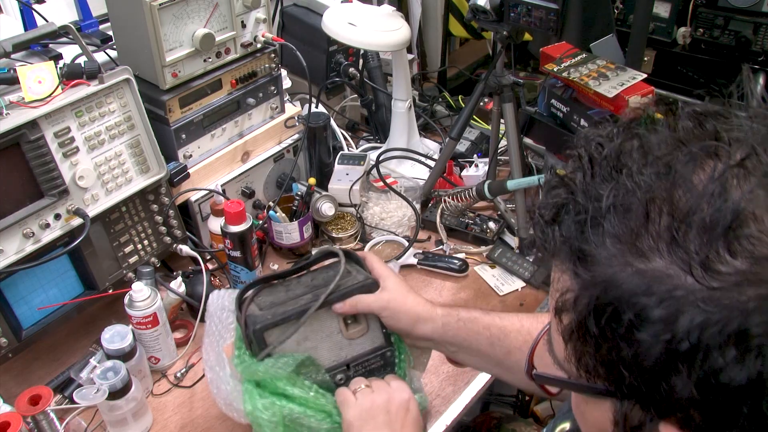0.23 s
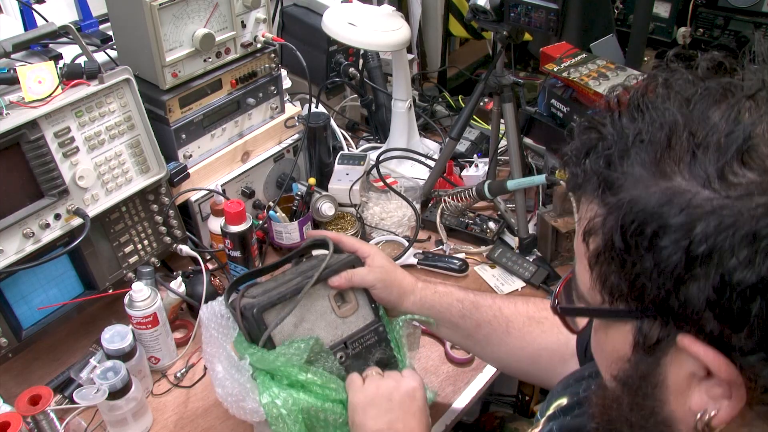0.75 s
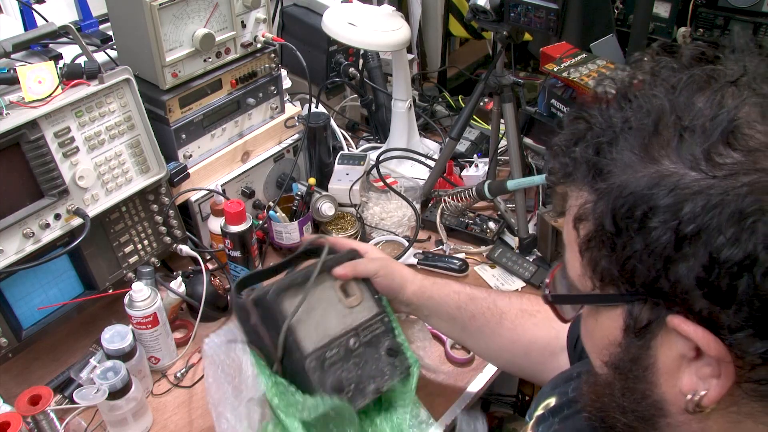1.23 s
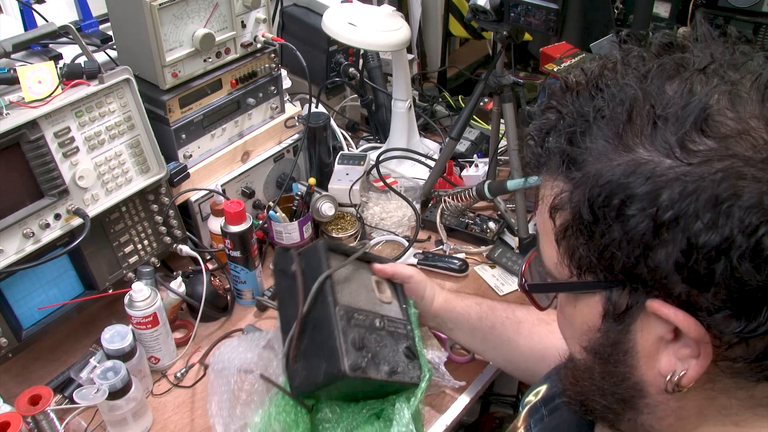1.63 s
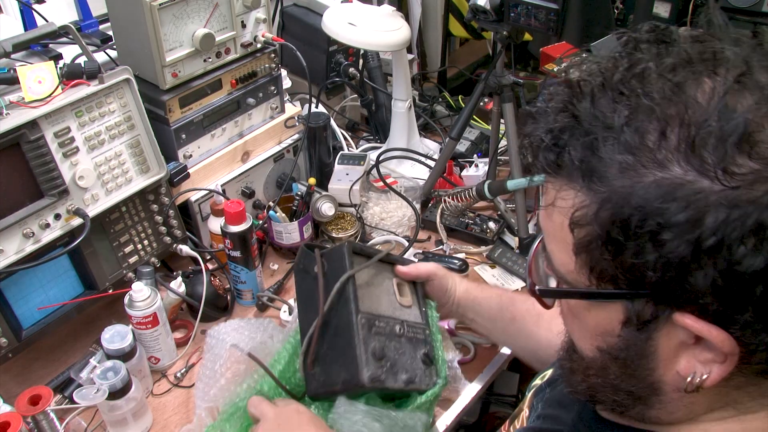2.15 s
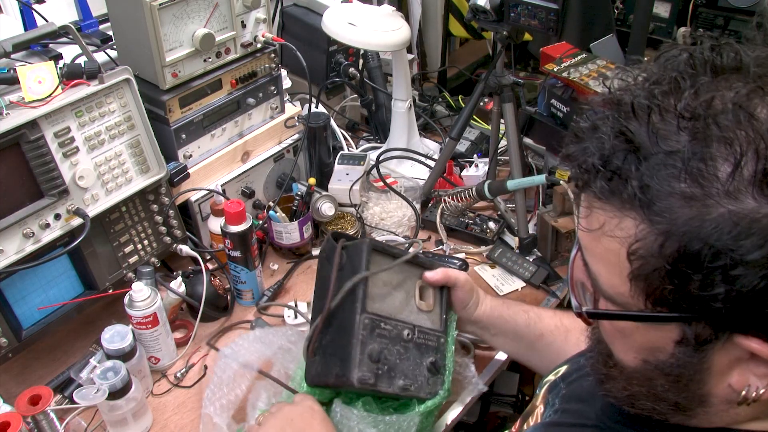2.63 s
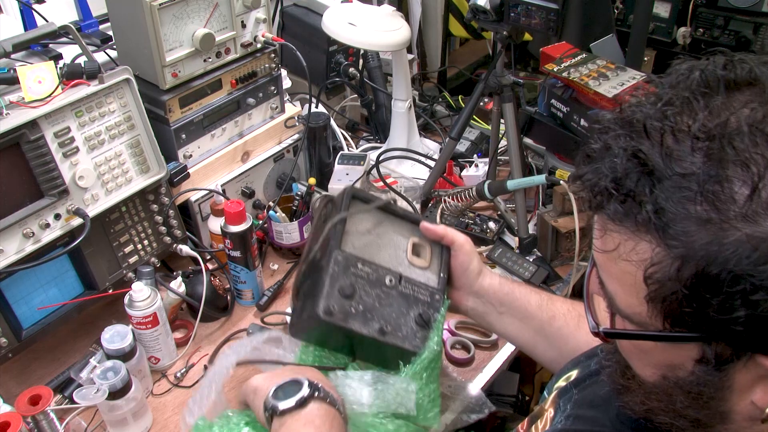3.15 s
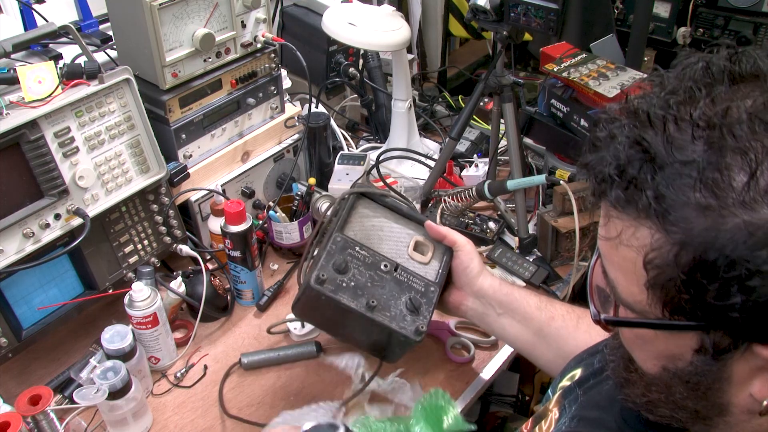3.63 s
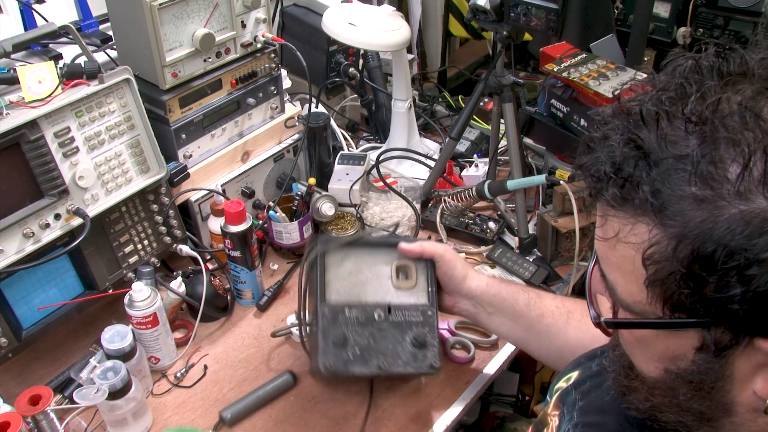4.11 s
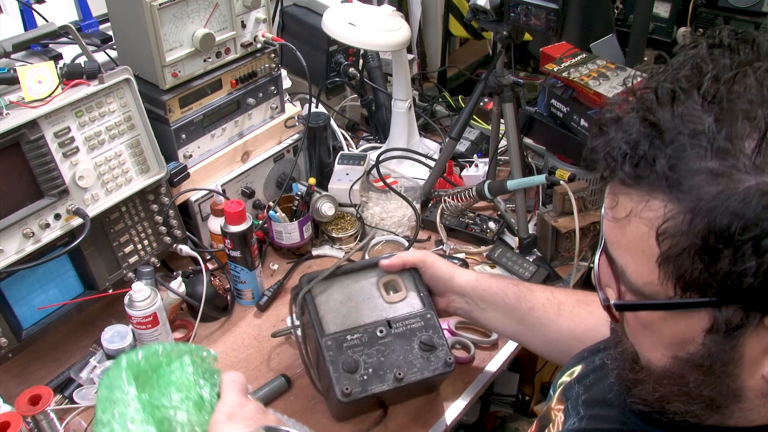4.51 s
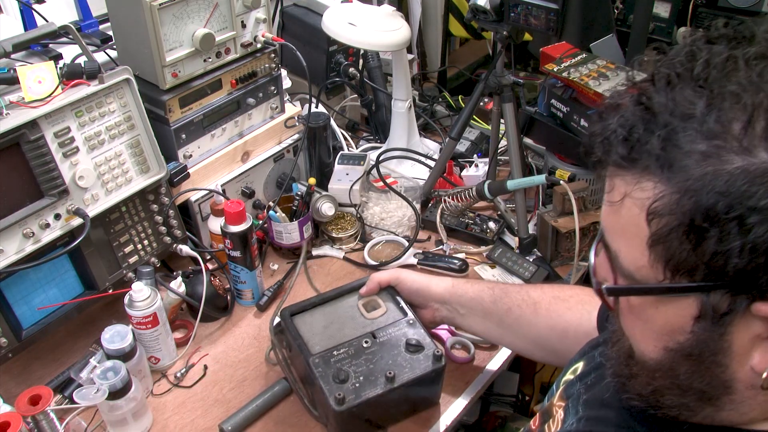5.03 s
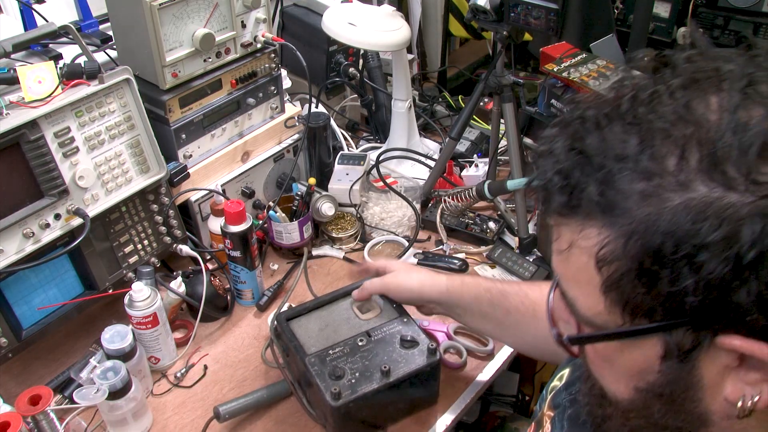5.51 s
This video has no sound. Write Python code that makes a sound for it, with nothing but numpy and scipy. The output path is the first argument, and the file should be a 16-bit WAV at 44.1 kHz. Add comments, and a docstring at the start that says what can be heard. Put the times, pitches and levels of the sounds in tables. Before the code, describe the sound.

Plastic wrap crackles in uneven pulls while a boxy instrument is rubbed, bumped and put down on a bench, over steady fan noise.

```python
"""A workbench in a cluttered room: bubble wrap is pulled off a small boxy instrument by hand.
The film buckles in thousands of tiny clicks and a few loud snaps. The hollow case rings when rubbed
or bumped, its fittings clink, its feet judder, and a probe lands on the bench with a crack. The last
of the film drags off with a thin stick-slip squeak, and the case is set down with two dull knocks.
Fans run steadily throughout."""
import sys
import numpy as np
from scipy import signal
from scipy.fft import rfft, irfft, next_fast_len
from scipy.io import wavfile
from scipy.ndimage import uniform_filter1d

SR = 44100
rng = np.random.default_rng(int(sys.argv[2]) if len(sys.argv) > 2 else 0)


def bounce(signal):
    """Save signal as a 16-bit WAV file at the path given by the first command-line argument."""
    frames = np.transpose(np.atleast_2d(signal))
    limited = np.clip(frames, -1, 1)
    pcm = np.round(limited * 32767).astype(np.int16)
    wavfile.write(sys.argv[1], SR, pcm)


N = 254456
TIME = np.arange(N) / SR
TOP_HZ = .45 * SR
SLIDE_ATTACK_S, SLIDE_T60_S = .041, .19


def undb(db):
    """Decibels to gain."""
    return 10 ** (np.asarray(db) / 20)


def unit(x):
    """Scale to rms 1."""
    return x / np.sqrt(np.mean(x ** 2))


def pan(left_db):
    """Left and right gains for a level difference."""
    return undb(np.array([[left_db], [-left_db]]) / 2)


def decay(t, t60_s):
    """Exponential fall, 60 dB in t60_s; 1 before t = 0."""
    return np.exp(-np.log(1000) * np.maximum(t, 0) / t60_s)


def add(out, start_s, sound):
    """Mix a sound in at start_s."""
    i = max(int(start_s * SR), 0)
    out[..., i:i + sound.shape[-1]] += sound[..., :N - i]


def band(x, lo_hz, hi_hz, order=2):
    """Butterworth band-pass."""
    return signal.sosfilt(signal.butter(order, [lo_hz, hi_hz], "band", fs=SR, output="sos"), x)


def colour(x, spectrum):
    """Filter by a curve of (f/Hz, level/dB) points."""
    hz, db = np.transpose(spectrum)
    size = next_fast_len(N)
    bins_hz = np.maximum(np.fft.rfftfreq(size, 1 / SR), 1)
    gain = undb(np.interp(np.log(bins_hz), np.log(hz), db))
    return irfft(rfft(x, size) * gain, size)[..., :N]


def convolve(x, response):
    """Apply a left and right impulse response."""
    return signal.oaconvolve(np.atleast_2d(x), response, axes=1)[:, :N]


def burst(t60_s, hold_s=0):
    """Unit-energy stereo noise: holds, then decays."""
    t = np.arange(int(SR * (hold_s + t60_s)) + 2) / SR
    noise = rng.standard_normal((2, len(t))) * decay(t - hold_s, t60_s)
    return noise / np.sqrt(np.sum(noise ** 2, axis=1, keepdims=True))


def pop(x, db, over_s=.003):
    """Scale a short sound to an rms level, its energy taken over over_s."""
    return x * undb(db) * np.sqrt(over_s * SR / np.sum(x ** 2, axis=1, keepdims=True))


def ring(modes, wide_hz):
    """Damped modes; left and right drift out of phase with pitch, 90 degrees from wide_hz up."""
    t = np.arange(SR // 2) / SR
    out = 0
    for k, (hz, db, t60_s) in enumerate(modes):
        skew_rad = (-1) ** k * min(hz / wide_hz, 1) * np.array([[1], [-1]]) * np.pi / 4
        out = out + undb(db) * np.sin(2 * np.pi * hz * t + skew_rad) * decay(t, t60_s)
    return out


def clicks(per_s, spread_db):
    """Random impulses of either sign and log-normal size."""
    due = rng.random(N) < per_s / SR
    size = undb(spread_db * np.minimum(rng.standard_normal(N), 2.5))
    return due * size * rng.choice([-1, 1], N)


def strokes(rows, attack_s, t60_s):
    """Envelope of hand movements: each rises, holds and decays; powers add."""
    power = 0
    for start_s, length_s, db in rows:
        rise = np.clip((TIME - start_s) / attack_s, 0, 1)
        fall = decay(TIME - start_s - length_s, t60_s)
        power = power + (undb(db) * rise * fall) ** 2
    return np.sqrt(power)


# Room tone spectrum: f/Hz, level/dB
ROOM_SPECTRUM = [(18, -39), (30, 2), (145, 3), (194, -10.5), (364, -5.5), (1350, -15), (1540, -12),
                 (6550, -12), (14000, -22), (16000, -28)]
def room_tone(level_db=-44.5):
    """Steady fans and hiss; part of the rumble is common to both sides."""
    hiss = rng.standard_normal((2, N))
    hiss -= .094 * band(hiss, 18, 270, order=1)
    rumble = .4 * band(rng.standard_normal(N), 18, 370, order=1)
    return undb(level_db) * unit(colour(hiss + rumble, ROOM_SPECTRUM))


# Pulls on the wrap: t/s, length/s, level/dB, relative sheet body/dB, relative crispness/dB
PULLS = [(-.06, 0.052, -28, -5, -12), (0.086, 0.11, -29.5, -8, -9.5), (0.278, 0.31, -31.5, -6, -11),
         (0.672, 0.083, -26.5, -9, -9.5), (0.757, 0.13, -24, -11, -9), (.93, 0.045, -22, -6.5, -5),
         (1.063, 0.085, -22, -7.5, -10), (1.096, 0.029, -26.5, -17, 0), (1.216, 0.23, -26.5, -6.5, -14),
         (1.49, 0.15, -26.5, -5, -10), (1.69, 0.23, -29, -8, -10), (1.916, 0.27, -35, -5.5, -9.5),
         (2.073, 0.28, -34, -2.5, -10), (2.338, .16, -28, -6.5, -11), (2.52, 0.29, -31.5, -3, -14.5),
         (2.875, 0.067, -28, -8.5, -7), (3.084, 0.26, -31.5, -7, -7.5), (3.314, 0.055, -26, -7.5, -7.5),
         (3.454, 0.061, -25.5, -5, -7), (3.698, 0.21, -37.5, -6.5, -5.5), (3.829, 0.4, -35, -8, -7),
         (4.368, 0.15, -38, -4, -10.5), (4.62, 0.19, -49, -1, -12), (4.806, 0.12, -40, -7.5, -9),
         (4.919, 0.24, -33, -5, -9.5), (5.247, 0.051, -36.5, -4.5, -8.5), (5.683, 0.088, -35.5, -8.5, -10)]
def pulling(share_db=0):
    """Envelope of the pulls, each offset by share_db: builds, holds, then the film settles."""
    start_s, length_s, db = np.transpose(PULLS)[:3]
    return strokes(zip(start_s, length_s, db + share_db), attack_s=.061, t60_s=.78)


# Film spectrum: f/Hz, level/dB
FILM_SPECTRUM = [(35, -39), (60, -17), (149, 5.5), (212, -1), (371, 8.5), (636, 5.5), (682, -0.5),
                 (732, 4.5), (882, -1.5), (1140, -2.5), (2520, -6), (6580, -6), (8120, -9), (12700, -9),
                 (16000, -13)]
def crinkle(effort, facet_db=10, shiver_db=-4, slip_db=-8, catch_db=.99):
    """Facets buckle, each at its own pitch and pan, over the hiss of film sliding on film."""
    facets = 0
    for hz in np.geomspace(800, 11000, 36):
        click = undb(shiver_db) * burst(t60_s=.076)
        add(click, 0, burst(t60_s=.005))  # sharp tick ahead of the sheet's shiver
        click += undb(facet_db) * band(click, hz / 1.35, hz * 1.35, order=1)
        buckles = clicks(per_s=70, spread_db=4.1)
        facets = facets + convolve(buckles, click * pan(2 * rng.standard_normal()))
    hiss = undb(slip_db) * rng.standard_normal((2, N))
    film = colour(unit(facets) + hiss, FILM_SPECTRUM)
    bass = band(film.mean(axis=0), 92, 370)  # long waves reach both sides alike
    body = band(film, 490, 1435, order=3)
    sheet = (body + undb(-1) * bass) / np.std(body)
    crackle = unit(band(film, 1683, 7720, order=4))
    crisp = unit(band(film, 8680, TOP_HZ, order=4))
    catch = undb(catch_db * unit(band(rng.standard_normal(N), 9, 18)))  # film catches and gives
    body_db, crisp_db = np.transpose(PULLS)[3:]
    pulled = pulling(body_db) * sheet + effort * crackle + pulling(crisp_db) * crisp
    return catch * pulled * pan(-1)


def creases(effort, per_s=8, at_db=-24.5, offset_db=-6, thud_db=-7, treble_db=-9):
    """Rows of small random snaps, per_s at an effort of at_db; harder pulls give more, and louder."""
    due = rng.random(N) < per_s * effort / undb(at_db) / SR
    rows = []
    for i in np.flatnonzero(due):
        db = 20 * np.log10(effort[i]) + offset_db + rng.uniform(-2, 2)
        hz = 3000 * (6800 / 3000) ** rng.random()
        rows.append((i / SR, db, thud_db, treble_db, hz))
    return rows


# Sharp cracks: creases snapping, and a probe landing on the bench:
# t/s, level/dB, relative thud/dB, relative treble/dB, f/Hz
CRACKS = [(.7184, -20, -7, -14, 2100), (.8012, -21, -13, -4, 6300), (.8314, -19, -11, -12, 6400),
          (.8937, -13.5, -2.5, -9, 1900), (.9127, -21, -5, -8, 3200), (.9276, -18, -11, -9, 4500),
          (.943, -17, -9, -4, 4500), (.9698, -18.5, -8, -14, 6500), (.9767, -16.5, -10, -13, 4400),
          (.985, -17, -7, -11, 4600), (1.0066, -13.5, -2.5, -10, 5300), (1.1518, -21, 2, -6, 4200),
          (1.1822, -17, -13, -8, 6700), (1.3029, -13.5, -14, -21, 3100), (1.5873, -22, -9, -12, 3100),
          (2.4163, -23, -11, -7, 3000), (2.9484, -17.5, -8, -1, 5000), (3.37, -22.5, -2, -9, 4800),
          (3.4812, -8, -7, -9.5, 3000), (3.5683, -21, -17, -15, 4500), (4.1478, -32, 2, -10, 3700),
          (4.6209, -39, -5, 0, 6800), (5.1567, -20.5, -17, -22, 6100)]
def cracks(rows, thud_hz=880, tone_db=6, flutter_db=-12):
    """Pitched crack, thud and flutter; for a crease, the air cells thump and the sheet flutters."""
    out = np.zeros((2, N))
    for start_s, db, thud_db, treble_db, hz in rows:
        crack = burst(t60_s=.004, hold_s=.0011)
        tone = undb(tone_db) * band(crack, hz / .97, hz * 1.04, order=1)
        add(out, start_s, pop(band(crack, 1800, 8500) + tone, db))
        add(out, start_s, pop(band(crack, 7500, 12500), db + treble_db))
        jolt = burst(t60_s=.01)[:1]  # the thud is low enough to reach both sides alike
        thud = band(jolt, 260, 1500, order=3) + band(jolt, thud_hz / 1.3, thud_hz * 1.3)
        add(out, start_s, pop(thud, db + thud_db))
    return out + undb(flutter_db) * convolve(out, burst(t60_s=.026))


# Hollow case modes: f/Hz, level/dB, t60/s
CASE_MODES = [(201, -10, 0.16), (233, 4, 0.017), (292, -24.5, 0.16), (352, -2, 0.1), (401, -7, 0.091),
              (444, -6, 0.042), (560, -6, 0.045), (719.5, -10, 0.14), (940, -21, 0.091),
              (1108, -6.5, 0.038), (1370, -18, .08), (1636, -6, 0.043)]
# Hand and wrap rubbing the case: t/s, length/s, level/dB
RUBS = [(.09, 0.087, -27.5), (.5, .1, -29), (1.38, 0.11, -25), (2.06, 0.067, -27), (2.21, 0.091, -32),
        (2.66, 0.092, -31), (2.85, 0.1, -32), (3.17, 0.366, -33), (3.82, 0.45, -34), (4.33, 0.1, -33.5),
        (4.82, 0.064, -37), (4.93, 0.29, -32.5)]
def rubbing():
    """Skin and film stick and slip on the case and make it murmur."""
    slips = band(clicks(per_s=700, spread_db=0), 231, 680)
    murmur = convolve(slips, ring(CASE_MODES, wide_hz=790))
    power = uniform_filter1d(np.mean(murmur ** 2, axis=0), SR // 25)
    murmur /= np.sqrt(power + 1e-9)  # the grip alone sets the level
    grip = strokes(RUBS, SLIDE_ATTACK_S, SLIDE_T60_S)
    return undb(-8.5) * grip * murmur * pan(-6)


# Bench top modes: f/Hz, level/dB, t60/s
BENCH_MODES = [(60.3, -29, 0.97), (72.9, -17, 0.87), (86.6, -5, 0.33), (121.7, -4, 0.22), (149, -0.5, 0.11),
               (201, 7.5, 0.064)]
# Blows on the case: t/s, level/dB, bench share/dB, contact/ms, f/Hz favoured by the struck spot
KNOCKS = [(.361, -11, -37, 0.74, 302), (.718, -16, -26, 0.86, 304), (0.745, -17.5, -27, 0.46, 364),
          (1.154, -19, -12.5, .2, 210), (2.766, -16, -24.5, 0.37, 334), (2.885, -22, -15, 0.36, 488),
          (3.482, -19, 0, 0.69, 800), (3.618, -24, -5, .57, 410), (4.147, -23, -5, .3, 600),
          (4.212, -4.5, -21, 0.62, 505), (4.214, -6.5, -1, 1.9, 191), (4.288, -39, 8, 0.68, 380),
          (4.582, -29, -17, 0.82, 430), (4.741, -28, -14, 0.71, 415), (5.201, -28.5, -4, 1.1, 376),
          (5.304, -19.5, -3.5, 0.53, 302)]
def knocks(clatter_db=-2, spot_db=7, grip_detune=.031):
    """Each blow rings the case and shakes the bench; longer contact sounds duller."""
    out = np.zeros((2, N))
    bench = band(ring(BENCH_MODES, wide_hz=342), 56, 1300, order=4)
    for start_s, db, bench_db, contact_ms, spot_hz in KNOCKS:
        contact_samples = contact_ms * SR / 1000
        force = np.sin(np.pi * np.minimum(np.arange(SR // 200) / contact_samples, 1))
        modes = []
        for hz, mode_db, t60_s in CASE_MODES:
            boost_db = spot_db * np.exp(-(4 * np.log(hz / spot_hz)) ** 2)  # within about 1/3 octave
            gripped_hz = hz * (1 + grip_detune * rng.standard_normal())
            modes.append((gripped_hz, mode_db + boost_db, t60_s))
        # a small body radiates little below its lowest mode
        case = undb(-5) * band(ring(modes, wide_hz=855), 236, 5500, order=3)
        add(case, 0, undb(clatter_db) * band(burst(t60_s=.09), 350, 4500))
        response = case * pan(-3) + undb(bench_db - 4) * bench * pan(-2)
        blow = signal.oaconvolve(response, force[None] / force.sum(), axes=1)
        add(out, start_s, undb(db) * blow)
    return out


# Narrow tones and rasps: squeaks of dragged film, and a thin ring after a snap:
# t/s, length/s, f/Hz, width/Hz, level/dB
NARROW_TONES = [(0.534, 0.071, 305, 30, -31.5), (1.005, 0.036, 6170, 220, -20),
                (2.249, 0.062, 410, 40, -32.5), (3.753, .08, 3080, 50, -42), (3.883, 0.2, 3040, 90, -41.5),
                (3.992, 0.22, 6970, 300, -38.5), (4.464, 0.14, 2030, 900, -39.5),
                (4.479, 0.065, 1170, 595, -36), (5.157, 0.025, 6070, 600, -36)]
def narrow_tones():
    """Swells of band noise: a thin tone when narrow, a rasp when wider."""
    out = np.zeros((2, N))
    for start_s, length_s, hz, width_hz, db in NARROW_TONES:
        swell = signal.windows.tukey(int(length_s * SR), .5)
        noise = rng.standard_normal((2, len(swell)))
        tone = unit(band(noise, hz - width_hz / 2, hz + width_hz / 2, order=1))
        add(out, start_s, undb(db) * swell * tone)
    return out


# Metal fitting modes: f/Hz, level/dB, t60/s
FITTING_MODES = [(820, -16, .03), (1650, -7, .02), (2760, -4, .025), (3020, 0, .05), (3190, -5, .025)]
# Taps on the fittings: t/s, level/dB
CLINKS = [(1.303, -11), (3.481, -13)]
def clinks():
    """Small metal fittings ring briefly when tapped."""
    taps = np.zeros(N)
    for start_s, db in CLINKS:
        add(taps, start_s, undb([db]))
    return convolve(taps, ring(FITTING_MODES, wide_hz=2030))


# Case rocking and sliding on the bench: t/s, length/s, level/dB
ROCKS = [(3.31, .12, -41.5), (3.91, 0.051, -35.5), (4.3, 0.15, -37), (5.15, .29, -34)]
def rocking():
    """The feet judder over the bench top and stir its lowest modes."""
    judder = band(clicks(per_s=500, spread_db=3), 55, 84)
    rumble = unit(convolve(judder, ring(BENCH_MODES, wide_hz=400)))
    return strokes(ROCKS, SLIDE_ATTACK_S, SLIDE_T60_S) * rumble * pan(-3.1)


def scene(reverb_t60_s=.33, reverb_db=-6.5):
    """Handling sounds, their short reverberation in the crowded room, and room tone."""
    air = room_tone()
    effort = pulling()
    direct = crinkle(effort) + cracks(creases(effort) + CRACKS)
    direct += rubbing() + knocks() + narrow_tones() + clinks() + rocking()
    tail = band(burst(reverb_t60_s), 69, TOP_HZ, order=1)
    walls = np.pad(tail, ((0, 0), (SR // 200, 0)))  # 5 ms pre-delay
    return direct + undb(reverb_db) * convolve(direct, walls) + air


def record(dry, cutoff_hz=15900):
    """Clip at full scale, then low-pass steeply."""
    lowpass = signal.ellip(10, .2, 80, cutoff_hz, fs=SR, output="sos")
    return signal.sosfilt(lowpass, np.clip(dry, -1, 1))


dry = scene()
out = record(dry)
bounce(out)
```